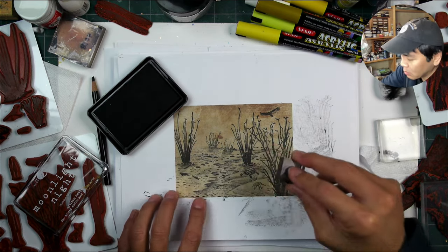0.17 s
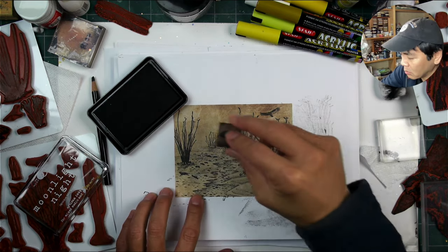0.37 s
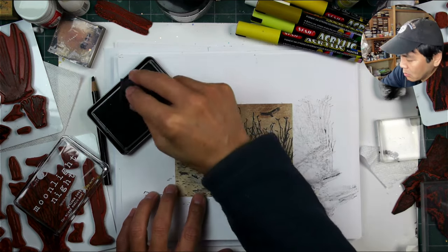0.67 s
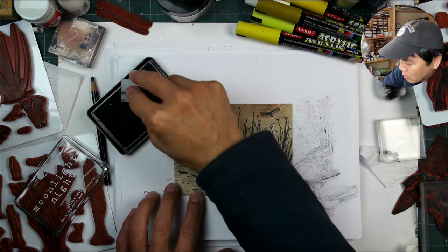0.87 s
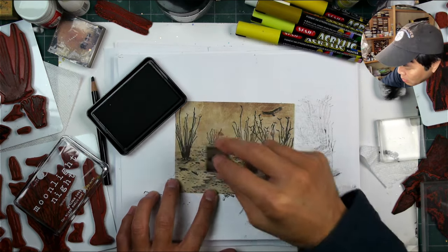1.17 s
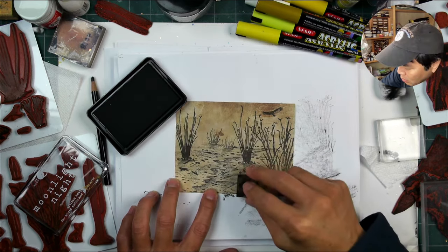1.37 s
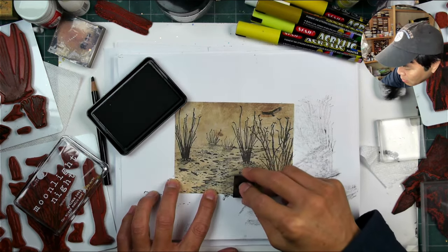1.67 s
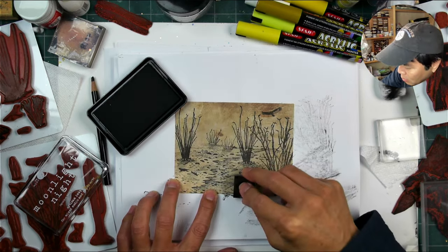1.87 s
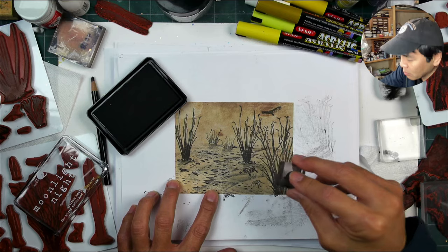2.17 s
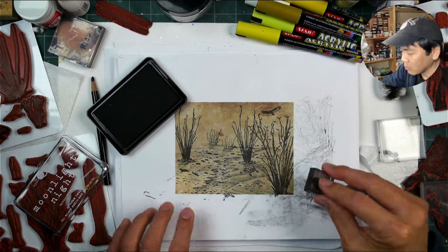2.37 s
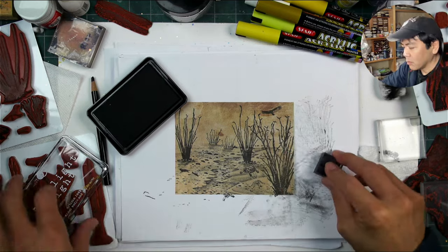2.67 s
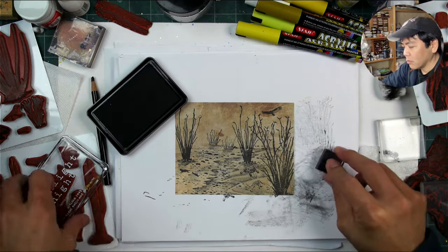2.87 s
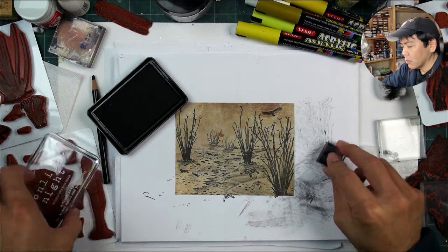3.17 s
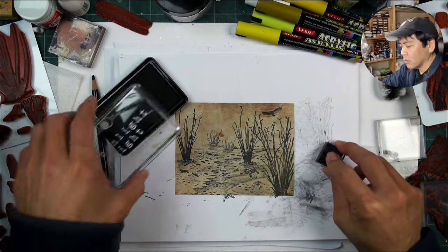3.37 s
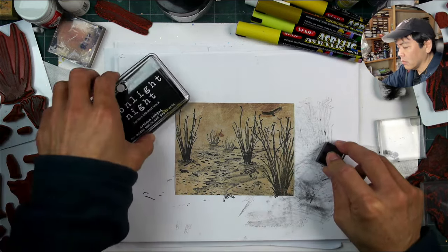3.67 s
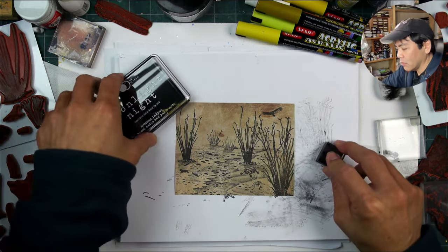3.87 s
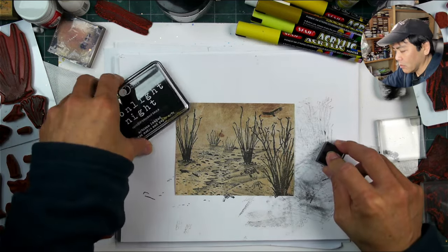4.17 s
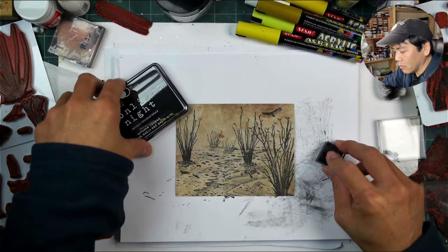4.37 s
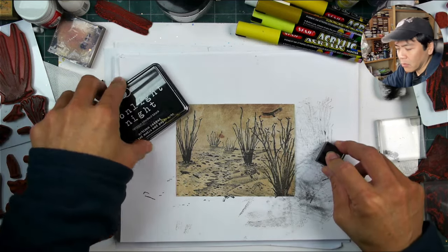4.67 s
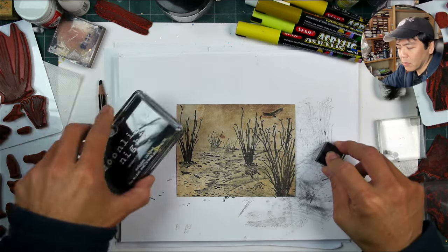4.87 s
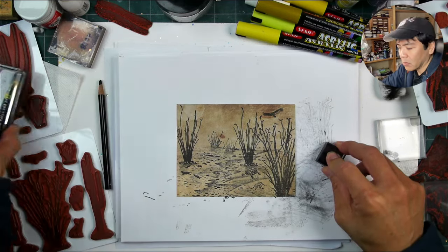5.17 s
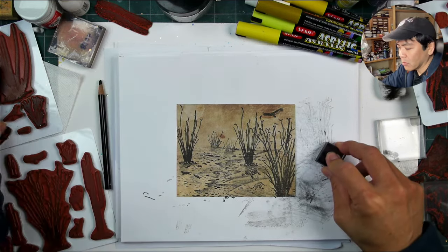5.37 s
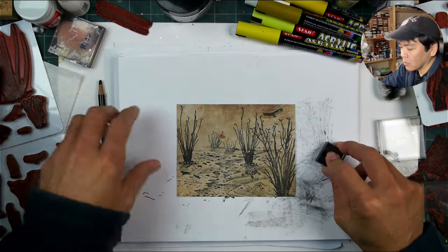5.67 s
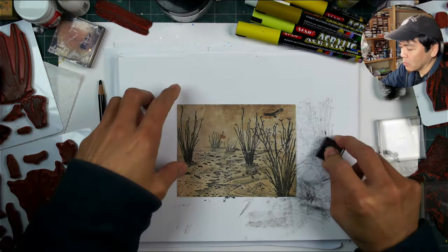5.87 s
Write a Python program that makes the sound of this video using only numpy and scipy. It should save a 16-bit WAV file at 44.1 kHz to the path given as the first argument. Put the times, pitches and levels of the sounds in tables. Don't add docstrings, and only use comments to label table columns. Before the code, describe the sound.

Close-miked craft work at a desk: two sharp bouncing clacks of a block on an ink pad case, then barely audible dabs on paper. Later fingers thump the pad, a light plastic lid knocks and clicks shut with a short chattering snap, then lands dully. Two last muted taps on paper finish it. Skin and sleeve brush softly on paper throughout, over faint hum and hiss in a small dry room.

```python
import sys
import numpy as np
from scipy import signal
from scipy.fft import rfft, irfft, next_fast_len
from scipy.io import wavfile
from scipy.ndimage import uniform_filter1d, map_coordinates

SR = 44100
rng = np.random.default_rng(int(sys.argv[2]) if len(sys.argv) > 2 else 0)


def dump_mix(stems):
    frames = np.atleast_2d(stems).T
    limited = np.clip(frames, -1, 1)
    pcm = np.round(limited * 32767).astype(np.int16)
    wavfile.write(sys.argv[1], SR, pcm)


def gain_from_db(level_db):
    decades = np.asarray(level_db, float) / 20
    return 10 ** decades


N = 265570


def unit(x):
    return x / np.sqrt(np.mean(x ** 2) + 1e-20)


def loudest(x):
    return np.sqrt(np.abs(uniform_filter1d(x * x, size=SR // 250)).max() + 1e-20)


def along(points, hz):
    f, value = np.transpose(points)
    return np.interp(np.log(hz + 1), np.log(f + 1), value)


def wobble(rate):
    knots = rng.standard_normal(int(N * rate / SR) + 4)
    return map_coordinates(knots, [np.arange(N) * rate / SR])


def filtered(x, gain):
    m = next_fast_len(N + 8192)
    return irfft(rfft(x, m) * gain(np.fft.rfftfreq(m, 1 / SR)), m)[..., :N]


def rush(gain):
    m = next_fast_len(N + 8192)
    spectrum = rfft(rng.standard_normal(m)) * gain(np.fft.rfftfreq(m, 1 / SR))
    return unit(irfft(spectrum, m)[:N])


def ring(modes, t, damping, scatter_db):
    out = np.zeros(len(t))
    for hz, db, t60 in modes:
        strength, apart = rng.standard_normal(2)
        fade = gain_from_db(db + scatter_db * strength - 60 * t / (damping * t60))
        twin = gain_from_db(-5) * np.sin(2 * np.pi * hz * (1 + 0.02 * apart) * t)
        out += fade * (np.sin(2 * np.pi * hz * t) + twin)
    return out


def tail(count, decay):
    hz, t, z = signal.stft(rng.standard_normal(count), SR, nperseg=256)
    faded = z * gain_from_db(-60 * t / along(decay, hz)[:, None])
    answer = signal.istft(faded, SR, nperseg=256)[1][:count]
    return np.pad(answer / np.linalg.norm(answer), (SR // 300, 0))


def bandpass(low, high):
    return signal.butter(2, [low, high], "bandpass", fs=SR, output="sos")


# (frequency [Hz], t60 [s])
ROOM = [(300, 0.27), (700, 0.18), (1500, 0.23), (4000, 0.22), (8000, 0.19), (13000, 0.19)]
EDGES_HZ = [1700, 5500, 16500]


def contacts(blows, modes, ring_db, damping, room_db, rise, top_hz=EDGES_HZ[2]):
    size = SR // 3
    out, t = np.zeros(N + size), np.arange(size) / SR
    for s, knock_db, knock_hz, click_db, edge_db, t60 in blows:
        u = t / t60
        start = 1 - np.exp(-u / rise)
        grains = rng.standard_normal(size) * np.abs(rng.standard_normal(size)) ** 0.83
        chatter = grains * start * gain_from_db(-60 * u) * (1 + 1.35 * np.exp(-u / (4 * rise)))
        answer = gain_from_db(room_db) * tail(size, ROOM)[:size] * (1 - np.exp(-u / (3 * rise)))
        body = ring(modes, t, damping, scatter_db=2) * start
        body = gain_from_db(ring_db) * body / np.linalg.norm(body)
        heard = chatter / np.linalg.norm(chatter) + answer + body
        heard = heard + signal.fftconvolve(answer, body)[:size]
        grip = 1 - 0.64 * (1 - np.exp(-t / 0.025))
        parts = [(bandpass(knock_hz / 1.468, knock_hz * 1.311), 0, grip),
                 (bandpass(*EDGES_HZ[:2]), click_db, -1),
                 (bandpass(EDGES_HZ[1], top_hz), edge_db, 1)]
        for sos, db, sign in parts:
            part = signal.sosfilt(sos, heard)
            out[round(s * SR):][:size] += sign * gain_from_db(knock_db + db - 0.5) * part / loudest(part)
    return out[:N]


# (time [s], knock peak [dB], click [dB], bright edge [dB])
RAPS = [
    (0.6502, -22, -2, -9),
    (0.6563, -21, -12, -6.5),
    (0.6601, -26, -7, -10.5),
    (0.798, -26, -7, -13.5),
    (0.804, -22, -12.5, -16.5),
]
# (frequency [Hz], level [dB], t60 [s])
CASE = [(1065, -8, .16), (1390, -3, .19), (1700, -12, .13), (1910, -10, .19), (3020, -8, .12),
        (3553, -13, .2), (3862, -4.5, .28), (4260, -7, .14), (4608, -11, .2), (5392, -6, .2),
        (5935, -7, .22), (7062, -6, .22), (7967, -14, .2), (8549, -11, .2)]


def stamp_raps():
    knock_hz, contact_s = 1470, 0.022
    blows = [(s, db, knock_hz, click, edge, contact_s) for s, db, click, edge in RAPS]
    return contacts(blows, CASE, ring_db=-3.5, damping=0.64, room_db=-3.5, rise=0.1)


# (time [s], knock peak [dB], knock pitch [Hz], click over knock [dB])
SHUT = [
    (4.167, -28, 950, -12),
    (4.172, -23.5, 1060, -15),
    (4.179, -28, 950, -5),
    (4.187, -26, 1050, -8),
]
# (time [s], knock peak [dB], knock pitch [Hz], click [dB], bright edge [dB])
LID = [(3.635, -40.5, 765, 4.5, -1.5), (3.681, -29, 780, 1, -1.5), (4.047, -55.5, 566, 0, 3),
       (4.06, -47, 690, -9, -27), (5.014, -41.5, 593, -19, -20), (5.244, -30.5, 676, -32, -36),
       (5.297, -33.5, 720, -20.5, -43), (5.304, -42, 1070, -6, -36), (5.36, -48, 1710, -13, -15)]
# (frequency [Hz], level [dB], t60 [s])
SHELL = [(437, -8, .12), (745, -1.5, .14), (940, -1.5, .12), (1128, -1.5, .12), (1535, -3, .14),
         (2060, -14, .1), (3970, -9, .14), (4720, -11, .12), (5480, -9, .15), (6500, -10, .13),
         (7190, -10, .14), (8600, -12, .15)]


def lid_shut_and_handled():
    snaps = [(*row, row[-1] + 1, 0.02) for row in SHUT]
    bumps = [(*row, 0.028) for row in LID]
    snapped = contacts(snaps, SHELL, ring_db=-5.5, damping=0.28, room_db=-3, rise=0.04)
    return snapped + contacts(bumps, SHELL, ring_db=-4, damping=0.1, room_db=0.0, rise=0.041)


# (time [s], knock peak [dB], knock pitch [Hz], click [dB], bright edge [dB])
PICK = [
    (2.555, -64, 700, 3, -3),
    (2.569, -45, 463, -2, 2),
    (2.644, -31, 1520, -11.5, -9.5),
]
# (frequency [Hz], level [dB], t60 [s])
RIM = [(1077, -5, 0.12), (1520, 4, .12), (3600, -4, 0.14), (4560, -9, .12), (5430, -5, .15),
       (5970, -2, .15), (6508, -2, 0.14), (7200, -14, .13), (9700, -8, 0.13), (10900, -14, .12)]


def lid_picked_up():
    blows = [(*row, 0.021) for row in PICK]
    return contacts(blows, RIM, ring_db=-9, damping=0.4, room_db=-1.6, rise=0.03, top_hz=11800)


# (time [s], knock peak [dB], knock pitch [Hz], click [dB], bright edge [dB])
TAPS = [(0.651, -27.5, 577, 4, -14), (0.798, -27, 480, 0, -26), (2.933, -30.5, 457, -19, -21),
        (3.114, -32, 453, -19.5, -20.5), (4.169, -24.5, 830, -10, -20), (5.792, -29, 446, -19.5, -24),
        (5.972, -29.5, 560, -10.5, -28)]
# (time [s], knock peak [dB], knock pitch [Hz], click over knock [dB])
DABS = [(0.435, -54, 352, -16.5), (0.543, -59.5, 754, -21.5), (0.646, -33.5, 610, -27.5),
        (0.791, -44.5, 700, -31), (1.245, -66, 448, -9), (1.509, -71, 571, -12), (1.538, -60, 549, -15),
        (1.617, -52.5, 593, -40), (1.638, -45, 504, -47), (2.755, -48.5, 580, -12), (3.769, -47, 452, -6),
        (3.857, -54, 800, -9.5), (4.122, -55, 530, -25), (5.575, -58, 575, -27)]
# (time [s],
# knock peak [dB], knock pitch [Hz])
UPPER_KNOCKS = [(0.434, -53.5, 1380), (1.639, -53, 890), (2.57, -51, 1250), (2.936, -41, 830),
                (2.949, -45.5, 1340), (3.116, -40.5, 870), (3.129, -56, 1020), (3.634, -38, 850), (3.68, -26, 836),
                (5.013, -49.5, 1310), (5.793, -40.5, 1140), (5.972, -34.5, 1120)]
# (time [s], knock peak [dB], knock pitch [Hz], click over knock [dB])
BRUSHES = [(1.859, -58, 581, -21), (2.499, -63.5, 781, -4), (2.812, -52.5, 760, -5),
           (2.824, -52.5, 705, -2), (2.838, -58, 565, -3), (3.989, -69, 595, -6),
           (4.401, -51.5, 427, -19.5), (4.615, -53.5, 475, -18.5), (4.644, -48, 504, -31),
           (5.599, -66.5, 740, -8), (5.694, -54, 714, 3.5), (5.729, -63, 759, -3)]
# (frequency [Hz], level [dB], t60 [s])
BOARD = [(480, -6.5, .04), (620, -0.5, 0.028), (814, -4.5, 0.03), (1320, -4.5, 0.033), (2400, -19.5, 0.018),
         (3950, -1.5, 0.021)]


def paper_pad():
    firm = [(*row, 0.04) for row in TAPS]
    light = [(*row, row[-1] - 13.5, 0.035) for row in DABS]
    upper = [(*row, -25.5, -36, 0.022) for row in UPPER_KNOCKS]
    slow = [(*row, row[-1] - 2.5, 0.083) for row in BRUSHES]
    taps = contacts(firm + light, BOARD, ring_db=-11.5, damping=0.6, room_db=1.5, rise=0.014)
    uppers = contacts(upper, BOARD, ring_db=-17, damping=0.62, room_db=-3, rise=0.056)
    brushes = contacts(slow, BOARD, ring_db=-29, damping=1.0, room_db=-1, rise=0.23)
    return taps + uppers + brushes


# (time [s], panel peak [dB])
DROPS = [(0.793, -39.5), (2.3, -57.5), (2.569, -51.5), (2.659, -54), (2.755, -48.5), (2.933, -40.5),
         (3.111, -40.5), (4.318, -62.5), (4.44, -55.5), (5.586, -60.5), (5.792, -36), (5.899, -57),
         (5.969, -32)]
# (time [s], panel peak [dB])
NUDGES = [(0.433, -50.5), (1.638, -59.5), (1.848, -65), (3.58, -65), (4.025, -59.5), (4.398, -48),
          (5.013, -45.5)]
# (time [s], panel peak [dB])
KNOCKS = [(0.644, -38.5), (3.68, -59), (3.769, -64.5), (4.167, -46.5), (4.199, -60), (5.244, -55),
          (5.294, -48.5)]
# (frequency [Hz], level [dB], t60 [s])
PANEL = [(84, -7, .2), (105, 0, .22), (128, -7, .15)]
# (frequency [Hz], level [dB], t60 [s])
SWAY = [(37, -1, .6), (52, -3, .4), (64, -2, .25)]
# (frequency [Hz], level [dB], t60 [s])
DRAWER = [(232.2, -1, 0.088), (281.3, -5.5, 0.071), (345, -3, 0.024)]


def desk():
    out, t = np.zeros(N + SR), np.arange(SR // 2) / SR
    # blows, frame sway [dB], drawer rattle [dB]
    for blows, sway_db, drawer_db in (DROPS, -8.5, -7), (NUDGES, -21, -9), (KNOCKS, -12.5, 3.9):
        # part, level [dB], rise [s]
        parts = (PANEL, 0, 0.003), (SWAY, sway_db, 0.015), (DRAWER, drawer_db, 0.0015)
        for s, panel_db in blows:
            for modes, db, rise in parts:
                swing = ring(modes, t, damping=0.9, scatter_db=4.5) * (1 - np.exp(-t / rise))
                out[round((s + 0.002) * SR):][:len(t)] += gain_from_db(panel_db + db + 1.0) * swing / loudest(swing)
    return out[:N]


# (time [s], length [s], rms level [dB], pitch [Hz])
SCUFFS = [(0.452, 0.13, -71.5, 780), (0.482, 0.066, -80, 1650), (2.306, .27, -87, 2100),
          (3.984, .05, -76, 2830), (4.381, 0.089, -68.5, 2060), (4.516, 0.059, -75.5, 1850),
          (5.018, 0.14, -65, 700), (5.03, 0.084, -69.5, 1900), (5.1, 0.069, -82, 1670),
          (5.425, 0.11, -78.5, 2800), (5.575, 0.13, -80, 1940)]


def scuffs():
    out = np.zeros(N + SR)
    for s, length, db, hz in SCUFFS:
        u = np.linspace(0, 1, round(length * SR))
        grains = rng.standard_normal(SR // 3) ** 3
        paper = signal.sosfilt(bandpass(hz / 1.1, hz * 1.1), grains)
        out[round(s * SR):][:len(u)] += gain_from_db(db) * unit(paper[-len(u):]) * np.sin(np.pi * u ** 0.74)
    return out[:N]


# (time [s], effort [dB])
SLIDE = [(0.0, -71.5), (0.27, -83), (0.47, -71), (1.05, -76.5), (1.94, -79.5), (2.16, -73.5), (2.55, -64),
         (2.8, -66), (2.95, -73), (3.44, -80), (3.84, -74.5), (4.39, -68.5), (4.68, -76), (4.91, -83.5),
         (5.05, -68.5), (5.3, -69), (5.78, -71), (6.02, -71)]


def effort():
    s, db = np.transpose(SLIDE)
    easy_db = -72
    return np.interp(np.arange(N) / SR, s, db) - easy_db


# (level at easy effort [dB], growth with effort [dB per dB], unevenness [dB])
STROKE = [(-72, 1.18, 2.6), (-81.5, 1.14, 1.8), (-87, 0.15, 4.3), (-86, -0.08, 1.3)]
# (frequency [Hz], level [dB per Hz])
RUB = [(88, -30.5), (150, -3), (210, -10), (486, -9.5), (545, -5), (963, -14.5), (1500, -28), (1950, -45),
       (3300, -120)]
# (frequency [Hz], level [dB per Hz])
SCRATCH = [(900, -30), (1300, -2), (1600, -1.5), (1950, -3), (2300, -5), (2700, -30.5)]
# (frequency [Hz], level [dB per Hz])
SQUEAK = [(2200, -30.5), (2600, -6), (2870, -3), (3150, -10.5), (3600, -32.5)]
# (frequency [Hz], level [dB per Hz])
FIZZ = [(1940, -24), (3300, -4), (3810, -4), (4400, -6.5), (10000, -18.5), (13000, -23), (22000, -120)]


def hands():
    def colour(shape):
        return lambda f: gain_from_db(along(shape, f)) * (f > shape[0][0]) * (f < shape[-1][0])

    out, work, stroke = np.zeros(N), effort(), wobble(22)
    for (db, grows, uneven_db), shape in zip(STROKE, (RUB, SCRATCH, SQUEAK, FIZZ)):
        level = db + grows * work + uneven_db * stroke + 1.6 * wobble(30)
        out += gain_from_db(level) * rush(colour(shape))
    return out


# (frequency [Hz], t60 [s])
FAR = [(200, .5), (1000, .5), (4000, 0.31), (12000, .3)]


def far_rooms(hits):
    return gain_from_db(-23) * signal.fftconvolve(hits, tail(SR // 2, FAR))[:N]


# (frequency [Hz], level [dB per Hz])
AIR = [(12, -37), (20, -2.5), (96, -2), (177, -18.5), (347, -12.5), (399, -16), (542, -10.5), (923, -17.5),
       (2390, -27), (2910, -33), (3340, -35), (7950, -32.5), (9670, -41), (14700, -33.5), (16000, -40)]


def room_tone():
    air = gain_from_db(-70.5 + 0.87 * wobble(5.8)) * rush(lambda f: gain_from_db(along(AIR, f)))
    fan_hz = 90 + 2.5 * wobble(7.5)
    hum = np.sqrt(2) * np.sin(2 * np.pi * np.cumsum(fan_hz) / SR)
    fan = gain_from_db(-72.5 + 1.1 * wobble(4.6)) * hum
    fuzz = rush(lambda f: 1 / (1 + ((f - 95) / 15) ** 2))
    tremor = gain_from_db(-72.5 + 1.3 * effort()) * fuzz
    return air + fan + tremor


# (frequency [Hz], level [dB])
CAPSULE = [(1200, -5.5), (2200, -7.5), (4000, -7.5), (7500, -7), (9600, -12.5), (11500, -12.5),
           (14500, -14.5), (16000, -16)]


def scene():
    blows = stamp_raps() + lid_shut_and_handled() + lid_picked_up() + paper_pad()
    hits = filtered(blows, lambda f: gain_from_db(along(CAPSULE, f)))
    return (hits + desk() + scuffs() + hands() + far_rooms(hits) + room_tone())[None]


def band_limit(x):
    return signal.sosfilt(signal.butter(12, 16360, fs=SR, output="sos"), x)


def record(dry):
    top_hz = 15850
    mix = filtered(dry, lambda f: f < top_hz)
    return band_limit(mix)


dry = scene()
out = record(dry)
dump_mix(out)
```